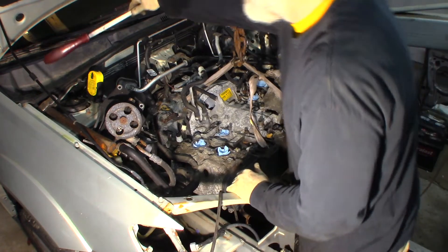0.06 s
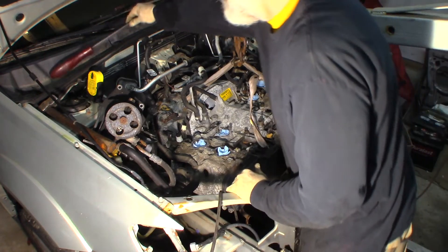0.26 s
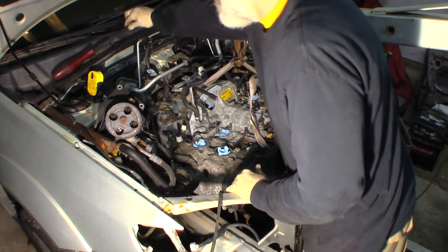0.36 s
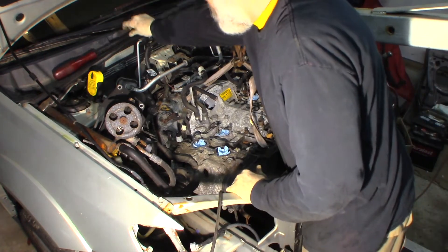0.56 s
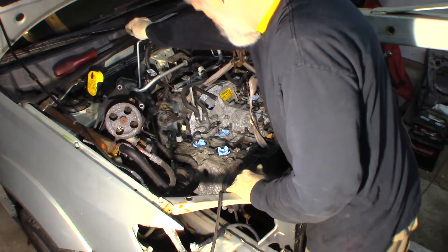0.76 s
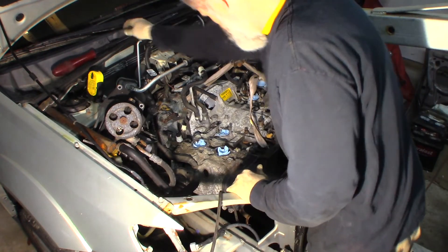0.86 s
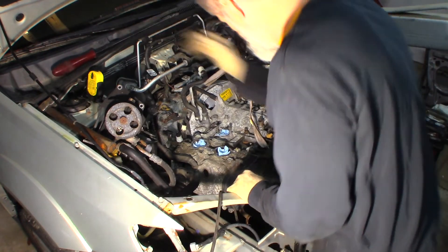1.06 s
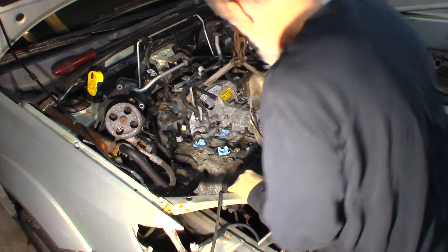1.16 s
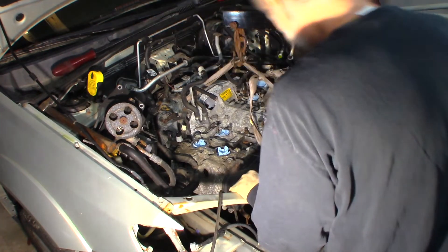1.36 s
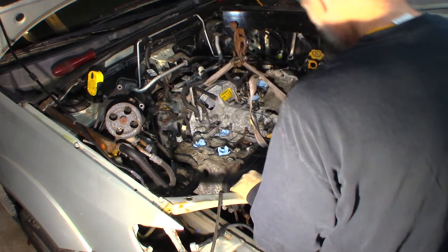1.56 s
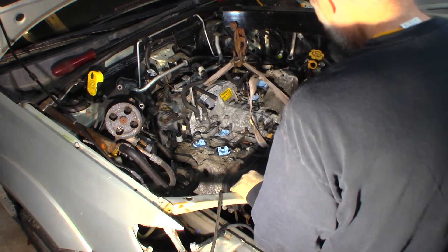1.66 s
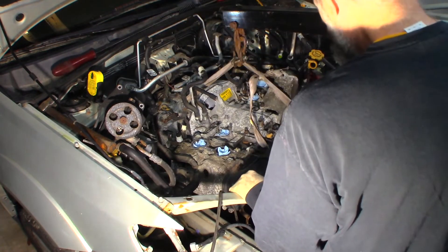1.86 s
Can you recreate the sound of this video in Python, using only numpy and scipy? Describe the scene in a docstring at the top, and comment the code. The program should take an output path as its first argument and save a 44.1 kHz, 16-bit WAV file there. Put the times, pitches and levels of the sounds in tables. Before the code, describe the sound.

A hanging engine drops with a heavy metal clunk at about 0.2 seconds, then rocks with smaller knocks, strongest around 0.6 to 0.7. Chain links tick and squeak faintly. A sleeve swishes softly near 0.9. At 1.35 the engine bumps dully against the car body, and lighter steel clanks ring from 1.45 to 1.8. Everything is close, with short workshop reverberation and a low hiss.

```python
"""In a workshop, an engine hanging from a hoist chain is pried loose: it drops with a heavy clunk, rocks and
knocks again, each impact exciting the damped modes of the block. Loaded links squeak and tick, and a sleeve
swishes by friction as the arm lets go of the bar. The engine bumps dully against the car body, then a loose
steel piece is struck several times and clanks with beating partials. The sound is near and almost mono, with
the room's short reverberation and a low hiss."""
import sys
import numpy as np
from scipy import signal
from scipy.fft import rfft, irfft, next_fast_len
from scipy.io import wavfile

SR = 44100
rng = np.random.default_rng(int(sys.argv[2]) if len(sys.argv) > 2 else 0)


def bounce(signal):
    """Save signal as a 16-bit WAV file at the path given by the first command-line argument."""
    frames = np.transpose(np.atleast_2d(signal))
    limited = np.clip(frames, -1, 1)
    pcm = np.round(limited * 32767).astype(np.int16)
    wavfile.write(sys.argv[1], SR, pcm)


N = 83790

# envelopes of the sleeve's rustle and the background noise: time_s, level_db
SLEEVE_ENVELOPE = [(0, -49.5), (.2, -56.5), (.78, -54.5), (.86, -50), (.95, -44.5), (1.02, -55),
                   (1.12, -51.5), (1.22, -52.5), (1.3, -58)]
HUSH_ENVELOPE = [(0, -61), (.08, -49), (.18, -56), (1.1, -58), (1.7, -51.5), (1.87, -48)]
# spectra of the rustle, the swish and the background noise: frequency_hz, density_db
CLOTH_SPECTRUM = [(150, 10), (450, 10.5), (1500, 6.5), (5500, 5), (8500, 0), (12000, -10.5), (15500, -24)]
SWISH_SPECTRUM = [(1000, -1), (4000, -11), (6500, -0.5), (9000, -5.5), (12000, -17), (15500, -24)]
HUSH_SPECTRUM = [(25, 8), (70, 6.5), (200, -12.5), (550, 1), (2000, -13.5), (6000, -40)]

# links slipping under load: start_s, level_db, pitch_hz
LINK_SQUEAKS = [(.149, -52, 8200), (.168, -53, 8200), (.19, -52, 8350), (0.307, -41.5, 9960),
                (.478, -49, 8400)]
# links settling: start_s, level_db
LINK_TICKS = [(0.022, -47.5), (0.4783, -43.5), (0.559, -45.5), (.846, -46.5), (1.149, -47.5),
              (1.172, -41.5)]
# spectrum of a tick: frequency_hz, density_db
TICK_SPECTRUM = [(500, -14), (3000, -15), (4800, 1), (7000, -2.5), (9000, -15), (15000, -27)]

# the engine's impacts: start_s, body_db, tilt_db_per_octave, rise_s, crack_db, crack_hz
ENGINE_KNOCKS = [(0.235, -11, 0, 0.00042, -8.5, 650), (0.2405, -43, 0, 0.0013, -22, 3330),
                 (0.2551, -26, 1, 0.0023, -20, 620), (0.3, -26, 3, 0.0024, -55, 970),
                 (.385, -31, -3, 0.0015, -25, 790), (0.4456, -28, 2, 0.00049, -22, 1140),
                 (0.561, -32.5, -5.5, 0.0085, -44.5, 280), (0.5964, -22, 2, 0.00026, -17, 4120),
                 (0.6443, -23, 1.5, 0.00081, -13, 1260), (.662, -19.5, 0.5, 0.0026, -23, 1350),
                 (.862, -33, -1, 0.0011, -41, 390)]
# contacts that take the engine's full weight: start_s, level_db
ENGINE_LANDINGS = [(0.235, -10), (0.5961, -19)]
# modes of the engine on its mounts, and of its damped heave on landing: pitch_hz, level_db, t60_s
BLOCK_MODES = [(120.4, -16.5, 0.57), (149, -14.5, 0.34), (229.5, -12, 0.55), (267.5, -0.5, 0.19),
               (303.3, 2.5, 0.23), (401, -8.5, 0.43), (515.6, -9, 0.46), (607, -12.5, 0.25),
               (775, -5.5, 0.15), (953, -8.5, 0.098), (1280, -27, 0.76), (1441, -25, 0.54)]
THUD_MODES = [(285, -1, .24), (594, -10, 0.11), (950, -17, 0.048)]
# spectra of a hard contact and of the block's crowd of weaker modes: frequency_hz, density_db
CRACK_SPECTRUM = [(100, -23), (600, 4.5), (1400, 3), (2200, -6.5), (4300, -11), (7500, -20.5), (15000, -48)]
BLOCK_SPECTRUM = [(50, -40), (90, -11.5), (130, -5), (260, 2.5), (420, -5), (900, -14.5), (2000, -27),
                  (3100, -29), (6500, -39.5), (10000, -50.5), (15000, -77)]
# damping of that crowd: frequency_hz, t60_s
BLOCK_DECAY = [(120, 0.41), (300, 0.42), (900, 0.58), (3000, 0.46), (9000, 0.35)]

# contacts with the car body: start_s, level_db, relative_scrape_db, rise_s
PANEL_BUMPS = [(1.212, -60, 11.5, .01), (1.333, -41.5, 5, 0.0082), (1.348, -33.5, 0.5, 0.0018),
               (1.360, -24.5, -15, 0.011)]
# modes of the body panel: pitch_hz, level_db, t60_s
PANEL_MODES = [(198.8, -2.5, 0.32), (230.6, 3, 0.18), (499, -1, 0.13), (1480, -11, 0.092),
               (1650, -5.5, 0.074), (4450, -8, 0.053)]
# spectrum of friction on the panel: frequency_hz, density_db
SCRAPE_SPECTRUM = [(60, -42), (220, -4), (600, 4.5), (1000, -5), (3600, -16), (4500, -18), (5600, -22),
                   (15000, -49)]

# blows on a single steel piece: start_s, kind ("large" a mid-pitched clank, "small" a brighter clink), ring_db,
# clatter_db, clatter_tilt_db_per_octave
STEEL_CLANKS = [(1.4512, "large", -27, -29, -0.5), (1.486, "large", -45, -40.5, -4),
                (1.521, "large", -38, -42, 3), (1.6782, "small", -38, -38.5, -0.5),
                (1.778, "large", -50.5, -45.5, -3.5)]
# modes of the steel piece, for a mid-pitched clank and for a brighter clink: pitch_hz, level_db, t60_s
CLANK_MODES = [(1306, -11.5, 0.75), (1643, -18, 0.28), (3373, 3.5, 0.073), (3508, -6, 0.37),
               (5040, -5, 0.15), (5860, -15, 0.22), (6220, -7.5, 0.48), (7230, -12, 0.19),
               (7800, -35, 0.55), (11800, -25, 0.072), (13400, -23, 0.1)]
CLINK_MODES = [(1372, -2, 0.32), (1645, 7.5, 0.068), (1788, 4, 0.2), (2527, 5, 0.043), (3400, -13, 0.55),
               (5260, -9.5, 0.65), (5800, -11, 0.43), (6270, -2.5, 0.4), (7150, -4.5, 0.4),
               (7940, -4.5, 0.21), (8840, -12, .24), (9300, -11, 0.32), (11400, -13.5, 0.13),
               (13600, -23, .13)]
# spectrum of their clatter: frequency_hz, density_db
CLATTER_SPECTRUM = [(100, -16.5), (210, -7), (420, -10.5), (1550, -2.5), (2800, -9), (3500, -3.5),
                    (4200, -15.5), (6400, -8), (8000, -15.5), (12000, -25), (15500, -36)]
# damping of the clatter and of the room: frequency_hz, t60_s
CLATTER_DECAY = [(300, 0.75), (1500, 0.44), (6000, 0.6), (13000, 0.091)]
ROOM_DECAY = [(150, 0.38), (1500, 0.81), (6000, 0.25), (14000, 0.55)]
# strength of sideways reflections: frequency_hz, side_over_mid_db
STEREO_WIDTH = [(250, -45), (600, -25.5), (1200, -22.5), (2500, -14), (9000, -20)]

STEEL_RISE_S = 0.0011


def amp(db):
    return 10 ** (np.asarray(db) / 20)


def unit_rms(x):
    return x / np.sqrt(np.mean(x ** 2) + 1e-20)


def seconds():
    return np.arange(N) / SR


def along(points, hz):
    """Interpolation on a logarithmic frequency axis."""
    frequencies, values = np.transpose(points)
    return np.interp(np.log(hz + 1), np.log(frequencies + 1), values)


def filtered(x, response):
    """Linear filtering multiplies the spectrum by a frequency response."""
    size = next_fast_len(N + SR // 2)
    return irfft(rfft(x, size) * response(np.fft.rfftfreq(size, 1 / SR)), size)[..., :N]


def noise(spectrum):
    """Spectral shaping turns white noise into coloured noise of rms 1."""
    return unit_rms(filtered(rng.standard_normal(N), lambda hz: amp(along(spectrum, hz))))


def tilted(x, slope_db, pivot_hz):
    """Spectral tilt of slope_db an octave, within two octaves of the pivot."""
    return filtered(x, lambda hz: amp(slope_db * np.clip(np.log2((hz + 1) / pivot_hz), -2, 2)))


def fade(t60):
    """Exponential decay, 60 dB in t60 seconds."""
    return np.exp(-np.log(1000) * seconds() / t60)


def damped(x, t60s):
    """Frequency-dependent damping: each band decays at its own rate."""
    hz, t, bands = signal.stft(x, SR, nperseg=256)
    decay = np.exp(-np.log(1000) * t / along(t60s, hz)[:, None])
    return signal.istft(bands * decay, SR, nperseg=256)[1][:N]


def placed(x, start_s, rise_s):
    """Onset at start_s, building up with time constant rise_s."""
    attack = 1 - np.exp(-seconds() / rise_s)
    return np.pad(x * attack, (round(start_s * SR), 0))[:N]


def flutter(knots_per_s=120):
    """Random modulation, interpolated between Gaussian values."""
    knots = rng.standard_normal(1024)
    return np.interp(seconds() * knots_per_s, np.arange(len(knots)), knots)


def ring(modes, roughness):
    """Modal vibration: damped sines that flutter in amplitude and phase."""
    out = np.zeros(N)
    for hz, db, t60 in modes:
        phase = 2 * np.pi * hz * seconds()
        wave = (1 + roughness * flutter()) * np.sin(phase) + roughness * flutter() * np.cos(phase)
        out += amp(db) * fade(t60) * wave
    return out / np.sqrt(1 + roughness ** 2)


def jangle(modes, partials=5, spread=0.00957, jitter_rad=0.58):
    """Beating: each mode of loose steel splits into close partials, different at every blow."""
    out = np.zeros(N)
    for hz, db, t60 in modes:
        for detune in spread * rng.standard_normal(partials):
            phase = 2 * np.pi * (hz * (1 + detune) * seconds() + rng.random())
            out += amp(db) * fade(t60) * np.sin(phase + jitter_rad * flutter())
    return out / np.sqrt(partials)


def sleeve(swish_s=0.915, swish_db=-42.5, rise_s=0.027, fall_s=0.016, grain_db=1.15):
    """Friction noise: cloth rustles with the arm and swishes once as it is pulled back."""
    t = seconds()
    width_s = np.where(t < swish_s, rise_s, fall_s)
    swish = amp(swish_db) * np.exp(-.5 * ((t - swish_s) / width_s) ** 2) * noise(SWISH_SPECTRUM)
    rustle_db = np.interp(t, *np.transpose(SLEEVE_ENVELOPE)) + grain_db * flutter()
    return swish + amp(rustle_db) * noise(CLOTH_SPECTRUM)


def hush():
    """Ambient noise: the workshop's low background, drifting in level."""
    return amp(np.interp(seconds(), *np.transpose(HUSH_ENVELOPE))) * noise(HUSH_SPECTRUM)


def chain(squeak_t60_s=0.028, tick_t60_s=0.064):
    """Slip and impact: loaded links squeak as they slide and tick as they settle."""
    squeaks = sum(placed(jangle([(hz, db, squeak_t60_s)]), start_s, STEEL_RISE_S)
                  for start_s, db, hz in LINK_SQUEAKS)
    ticks = sum(amp(db) * placed(noise(TICK_SPECTRUM) * fade(tick_t60_s), start_s, rise_s=.0004)
                for start_s, db in LINK_TICKS)
    return squeaks + ticks


def crack(centre_hz, peak_db=10, width_octaves=0.25):
    """Contact transient: a brief broadband burst, emphasised at the pitch of the struck spot."""
    def resonance(hz):
        octaves = np.log2((hz + 1) / centre_hz)
        return amp(peak_db * np.exp(-.5 * (octaves / width_octaves) ** 2))
    return unit_rms(filtered(noise(CRACK_SPECTRUM), resonance)) * fade(t60=0.017)


def engine():
    """Impact excitation: metal cracks on metal and the block's modes ring; full landings add a thud."""
    out = sum(amp(db) * placed(ring(THUD_MODES, roughness=0), start_s, rise_s=0.00033)
              for start_s, db in ENGINE_LANDINGS)
    for start_s, body_db, tilt_db, rise_s, crack_db, crack_hz in ENGINE_KNOCKS:
        crowd = placed(damped(noise(BLOCK_SPECTRUM), BLOCK_DECAY), start_s=0, rise_s=0.0018)
        body = amp(-1.5) * ring(BLOCK_MODES, roughness=0.36) + amp(-0.5) * crowd
        out += amp(body_db) * placed(tilted(body, tilt_db, pivot_hz=440), start_s, rise_s)
        out += amp(crack_db) * placed(crack(crack_hz), start_s, rise_s=.0001)
    return out


def panel_bump():
    """Plate vibration and friction: the swinging engine leans and scrapes on a body panel."""
    out = np.zeros(N)
    for start_s, db, scrape_db, rise_s in PANEL_BUMPS:
        panel = ring(PANEL_MODES, roughness=0.25)
        scrape = amp(scrape_db) * noise(SCRAPE_SPECTRUM) * fade(t60=0.29)
        out += amp(db) * placed(panel + scrape, start_s, rise_s)
    return out


def steel_clanks():
    """Free vibration: light steel is struck and rattles, clear high modes over a dense clatter."""
    out = np.zeros(N)
    for start_s, kind, ring_db, clatter_db, tilt_db in STEEL_CLANKS:
        clatter = tilted(damped(noise(CLATTER_SPECTRUM), CLATTER_DECAY), tilt_db, pivot_hz=3000)
        modes = jangle(CLANK_MODES if kind == "large" else CLINK_MODES)
        out += placed(amp(ring_db) * modes + amp(clatter_db) * clatter, start_s, STEEL_RISE_S)
    return out


def reverberation(x, t60s, delay_s):
    """Diffuse reflection: convolution with a decaying noise tail of unit energy."""
    tail = placed(damped(rng.standard_normal(N), t60s), delay_s, rise_s=0.00035)
    return signal.fftconvolve(x, tail / np.linalg.norm(tail))[:N]


def scene():
    """Superposition: sources and room add in the middle; reflections and noise give a little width."""
    direct = engine() + steel_clanks() + chain() + panel_bump() + sleeve()
    mid = direct + amp(-11) * reverberation(direct, ROOM_DECAY, delay_s=.014) + hush()
    scattered = reverberation(mid, t60s=[(1000, 0.16)], delay_s=0.00101)
    side = filtered(scattered, lambda hz: amp(along(STEREO_WIDTH, hz)))
    side += amp(-63) * noise(HUSH_SPECTRUM)
    return np.array([mid + side, mid - side])


def record(dry, low_cut_hz=99.7, peak_limit=.95, top_hz=15900):
    """Band limiting and soft saturation: deep bass and top treble are cut, the highest peaks rounded."""
    high_pass = signal.butter(N=4, Wn=low_cut_hz, btype="high", fs=SR, output="sos")
    lean = signal.sosfilt(high_pass, dry)
    rounded = lean / (1 + np.abs(lean / peak_limit) ** 10) ** (1 / 10)
    return filtered(rounded, lambda hz: hz < top_hz)


dry = scene()
out = record(dry)
bounce(out)
```